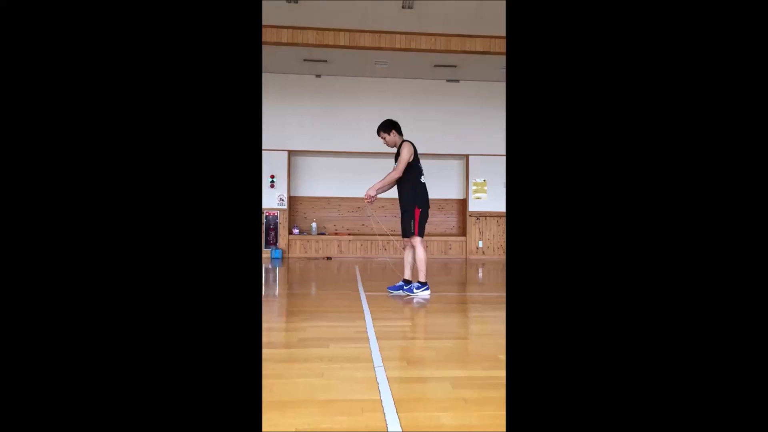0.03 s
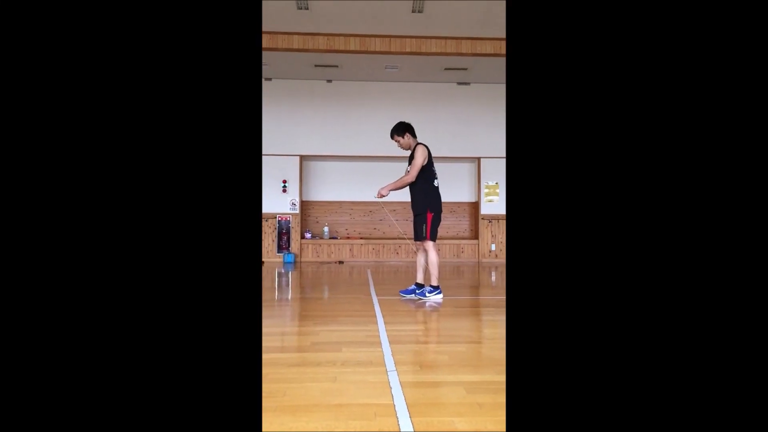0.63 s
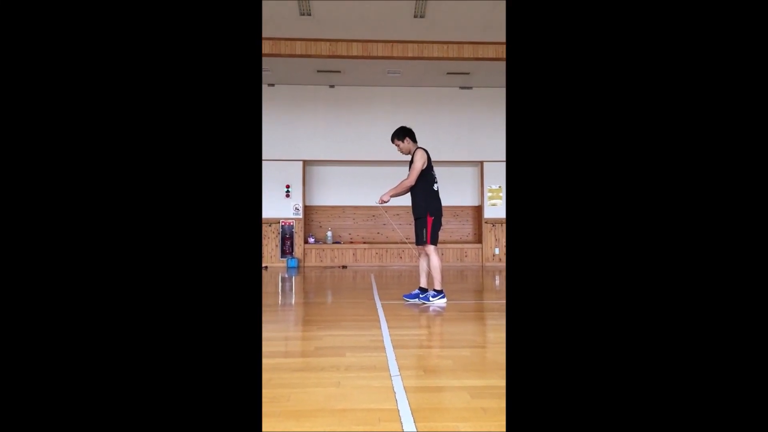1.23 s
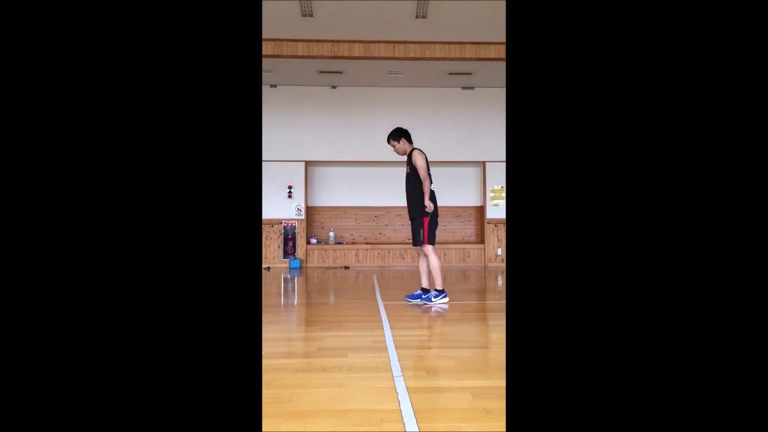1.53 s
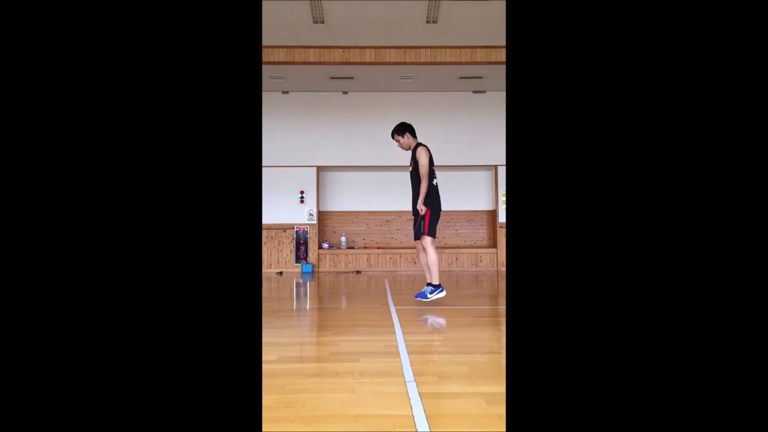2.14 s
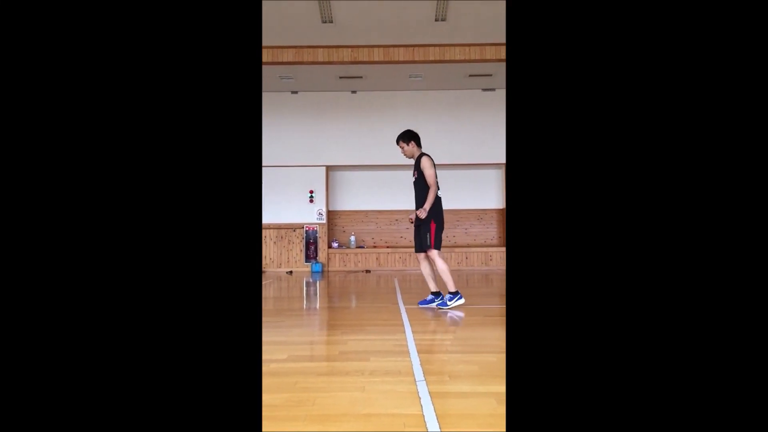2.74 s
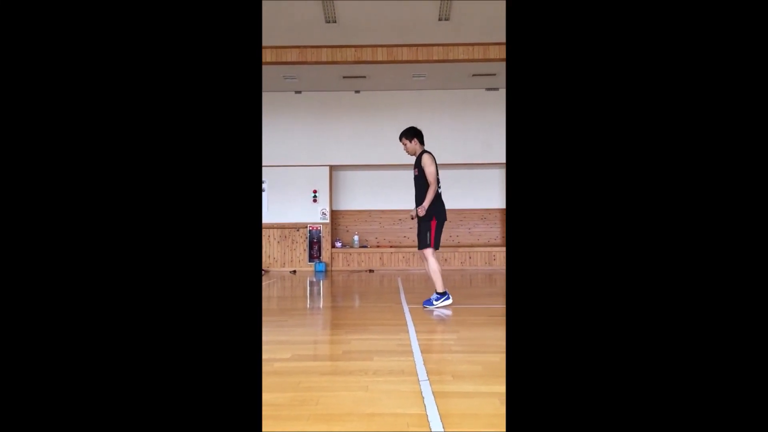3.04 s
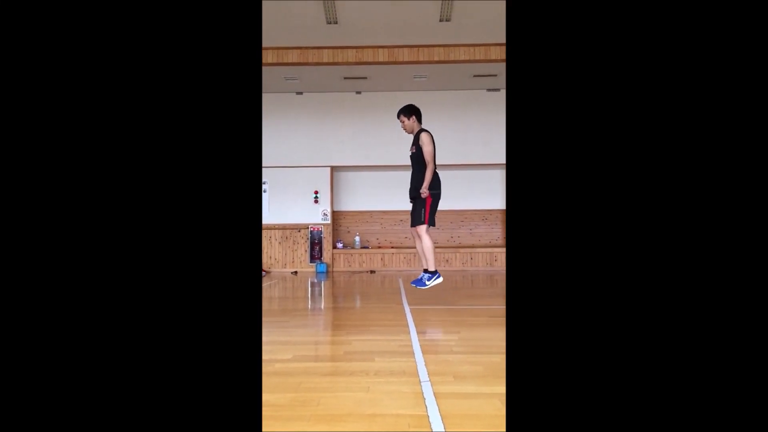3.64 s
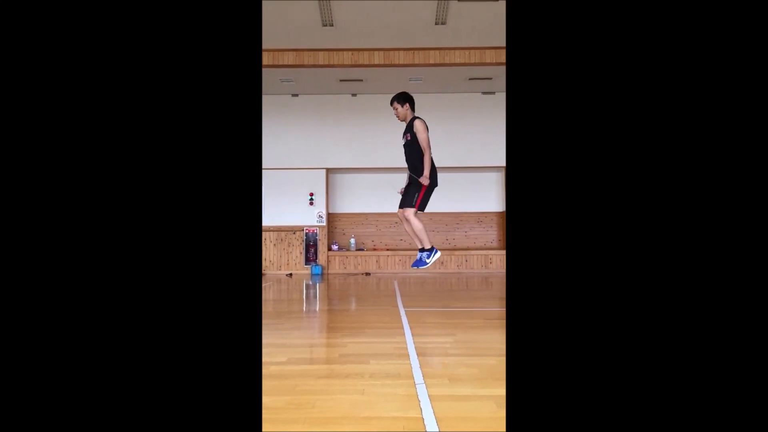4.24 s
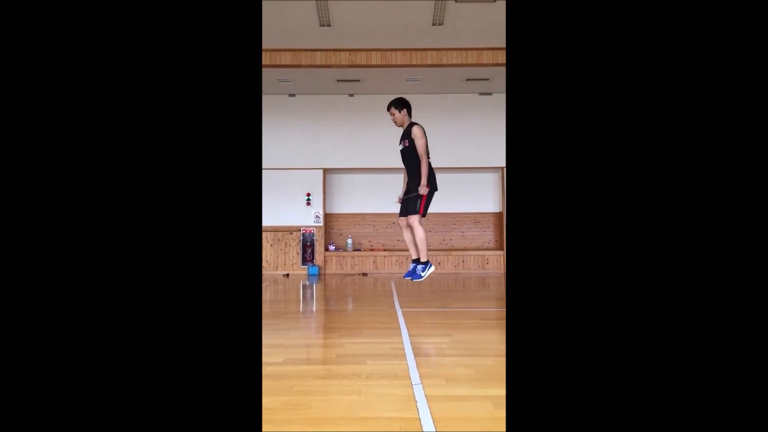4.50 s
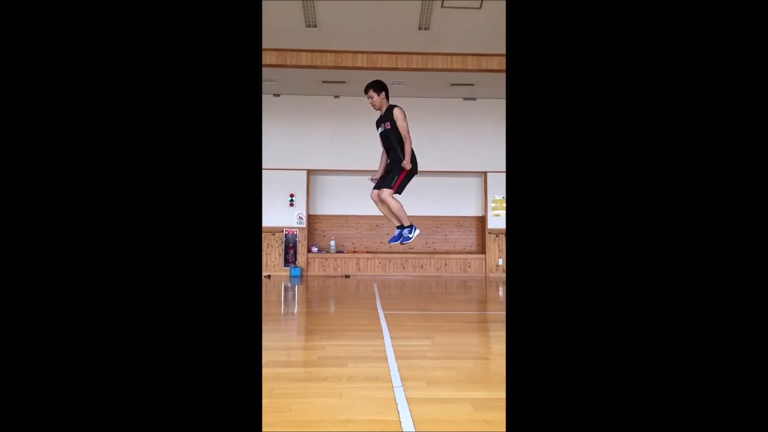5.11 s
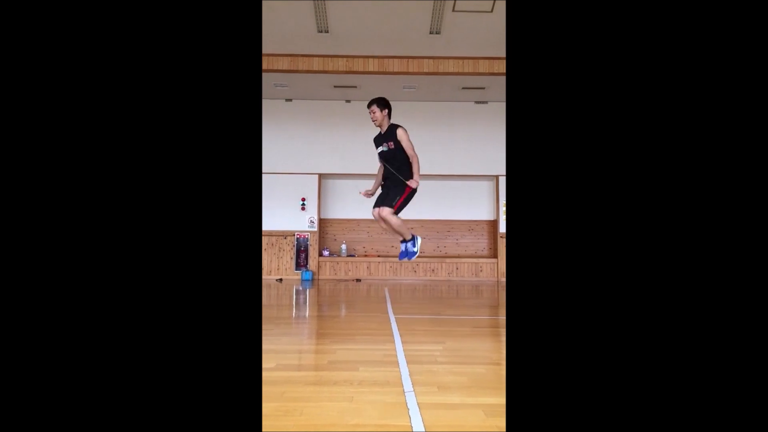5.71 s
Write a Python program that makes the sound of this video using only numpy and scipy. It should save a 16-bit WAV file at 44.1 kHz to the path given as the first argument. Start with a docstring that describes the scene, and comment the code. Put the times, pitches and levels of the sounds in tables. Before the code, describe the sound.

In a large, echoing gym, plastic skipping rope handles clack lightly over a few soft steps. Easy hops begin, the thin rope ticking on the wooden floor between shoe slaps and low booms from the boards. The jumps then grow higher and further apart, and the rope spins fast with a fluttering whistle that rises in pitch and loudness. A faint building rumble lies underneath.

```python
"""Speed skipping in a gym

Plastic handles clack as the rope is readied; a few easy hops lead to high jumps with fast turns.
Shoes slap the boards and excite the low modes of the sprung wooden floor, which booms.
The thin rope ticks on the boards and sheds vortices, whistling higher the faster it moves.
The large hall reverberates over the low rumble of the building."""
import sys
import numpy as np
from scipy import signal
from scipy.fft import rfft, irfft
from scipy.io import wavfile
from scipy.ndimage import uniform_filter1d

SR = 44100
rng = np.random.default_rng(int(sys.argv[2]) if len(sys.argv) > 2 else 0)


def to_wav(sig):
    """Store sig (one row per channel, or 1-D mono) as 16-bit WAV at the path in sys.argv[1].

    Samples outside -1..1 are clipped; the rate is SR.
    """
    pcm = np.clip(np.atleast_2d(sig), -1, 1) * 32767
    pcm = np.round(pcm).astype(np.int16)
    wavfile.write(sys.argv[1], SR, pcm.T)  # frames by channels


N = 262836
TIME = np.arange(N) / SR

# Levels in the tables are relative: gains and filters follow.
# spectra of the building, handles, floor, soles and rope strikes: (frequency [Hz], density [dB])
RUMBLE_SPECTRUM = [(25, -25), (45, -2), (70, 1.5), (130, -6), (250, -11), (450, -22), (1000, -23),
                   (2500, -24.5), (6000, -30), (16000, -37.5)]
CLACK_SPECTRUM = [(500, -9), (1000, -0.5), (1400, 1.5), (1800, 2), (2400, 1.5), (3100, 5.5), (3700, -1),
                  (4400, -3), (6000, -27), (16000, -43)]
CLICK_SPECTRUM = [(1500, -6), (4000, -8.5), (6000, 10.5), (8500, 1), (10500, 2), (14500, -10), (17000, -9)]
BOOM_SPECTRUM = [(22, -14), (42, -14.5), (70, 9.5), (90, 5), (130, 3.5), (175, -13.5), (300, -33),
                 (900, -17.5), (2000, -47)]
THUD_SPECTRUM = [(60, -21.5), (150, 5), (260, 4), (480, -3.5), (680, 0.5), (1100, -25), (1600, -17.5),
                 (2300, -20), (3800, -39), (7500, -29), (10000, -37), (16000, -64)]
SOLE_SPECTRUM = [(150, 1.5), (700, 16), (1300, -2.5), (1900, 3.5), (3300, 5), (7800, 0.5), (10500, -7.5),
                 (16000, -19)]
TICK_SPECTRUM = [(300, -13), (900, 10.5), (1400, 9), (2800, 3), (4300, 1), (7000, -4), (9500, -3.5),
                 (12000, -14), (16000, 3)]
SIZZLE_SPECTRUM = [(3000, -11), (9000, -12), (12000, -8.5), (15000, -8.5), (17000, -28.5)]
# decay of the hall, where a negative time means growth: (frequency [Hz], reverberation time [s])
HALL_DECAY = [(60, 2.24), (250, 1.5), (1000, 0.88), (3000, 0.7), (6000, 0.65), (10000, 0.2), (15000, -0.6)]
# reverberant against direct energy: (frequency [Hz], ratio [dB])
REVERB_RATIO = [(60, -0.1), (400, -1.64), (1200, -4), (3000, -7), (7000, -6.5), (15000, -6)]
# reflections off the nearest walls: (delay [s], level [dB])
WALL_ECHOES = [(.0293, -12), (.0492, -20)]
# handles and fittings colliding, the row at 0.282 s being a faint wall echo of the clack at 0.257 s: (time [s],
# hollow clack [dB], bright click [dB], ring pitch [Hz])
HANDLE_HITS = [(0.15, -63, -55.5, 7500), (0.257, -45.5, -43.5, 2520), (0.282, -54.5, -60, 2400),
               (0.598, -51.5, -52, 3940), (0.622, -47.5, -50, 3400), (0.652, -51, -68, 3550),
               (1.159, -54, -60, 2900), (1.607, -37, -41, 3910), (1.751, -47, -41.5, 3700),
               (1.777, -48, -37.5, 6160), (1.851, -37.5, -39, 5260), (1.855, -37.5, -36.5, 4440),
               (2.164, -46.5, -73, 2000)]
# soft steps and shifts of weight: (time [s], weight [dB])
SOFT_STEPS = [(0.147, -53.5), (0.43, -58.5), (0.8, -68), (1.19, -55.5), (1.271, -45.5), (1.741, -38.5),
              (1.849, -40), (2.26, -52.5)]
# boards resounding under a rolling foot: (frequency [Hz], level [dB], t60 [s])
BOARD_RESONANCES = [(644, -26, 0.098), (924, -19.5, 0.022)]
# the floor springs back as the feet leave for a high jump: (time [s], level [dB])
TAKE_OFFS = [(5.024, -32.5), (5.854, -20.5)]
# the floor takes the weight:
# (time [s], sway pitch [Hz], sway [dB], note pitch [Hz], note [dB], note rise [s], overtone [dB])
FLOOR_LOADS = [(1.276, 50, -60, 79.8, -43, 0.083, -47), (1.744, 50.7, -48, 80.6, -45.5, 0.13, -55),
               (2.465, 51.7, -35, 65.8, -38, 0.092, -35), (2.84, 47.7, -38.5, 67.8, -35.5, 0.089, -32),
               (3.2067, 49.5, -37, 67.5, -36.5, 0.088, -32), (3.578, 50.3, -35, 70.27, -30.5, 0.087, -35),
               (4.136, 46.95, -39, 69.6, -34, 0.23, -40), (4.86, 41.9, -29, 64.1, -41, 0.052, -26.5),
               (5.652, 41.6, -31, 72.8, -34, 0.093, -38)]
# feet coming down: (time [s], sole click [dB], board knock [dB], weight [dB])
FOOTFALLS = [(2.466, -24.5, -36.5, -35), (2.83, -22, -37.5, -38), (2.868, -23, -40.5, -41),
             (3.2057, -23, -43, -38.5), (3.578, -23, -35, -37), (4.136, -12.5, -28.5, -32),
             (4.861, -18, -28, -31.5), (5.648, -22, -28.5, -36.5), (5.652, -14, -23.5, -35.5)]
# the rope strikes the boards, then its loop slaps down:
# (time [s], tick [dB], board knock [dB], sizzle [dB], slap delay [s], slap [dB])
ROPE_STRIKES = [(2.357, -32.5, -34.5, -38, 0.015, -35), (2.7465, -29.5, -26.5, -35.5, 0.0079, -34),
                (3.112, -32, -33, -44, 0.0061, -39), (3.46, -35, -34, -38, 0.01, -33),
                (3.738, -46, -29.5, -66, 0.029, -48), (3.7775, -35, -32, -40.5, 0.0094, -32.5),
                (4.0537, -32, -26, -34.5, 0.0069, -30.5), (4.301, -32, -24.5, -60, 0.011, -39),
                (4.314, -24.5, -23, -45, 0.012, -18.5), (5.028, -25.5, -23.5, -39.5, 0.011, -33),
                (5.5996, -40, -20, -26, .0079, -31), (5.8173, -31, -18.5, -47, 0.012, -18.5)]
# the arms speed the rope up for each jump: (time [s], whistle pitch at the tip [Hz], level [dB])
SWING_CURVE = [(2.55, 1520, -77), (2.648, 1800, -70), (2.704, 2080, -60), (2.76, 2210, -68),
               (2.88, 1505, -72), (3.0, 1843, -60), (3.078, 2290, -69), (3.281, 1560, -80),
               (3.385, 1973, -70), (3.424, 2340, -58), (3.47, 2260, -79), (3.62, 1700, -66),
               (3.72, 2296, -58), (3.8, 2623, -50), (3.88, 2840, -51.5), (4.03, 2760, -55),
               (4.219, 2344, -52), (4.29, 2883, -50.5), (4.37, 3600, -37.5), (4.498, 3586, -39),
               (4.641, 3280, -50), (4.769, 3063, -48), (4.861, 2650, -58.5), (4.94, 2380, -54),
               (5.02, 3257, -38.5), (5.1, 3698, -39.5), (5.2, 4003, -35), (5.37, 4074, -36.5),
               (5.48, 3750, -41.5), (5.58, 3600, -41.5), (5.72, 2630, -49.5), (5.78, 3218, -43.5),
               (5.84, 4203, -31.5), (5.9, 4747, -24.5), (5.96, 5270, -26.5)]
# the wrists whip the rope round: (time [s], speed gained [fraction], level gained [dB])
WRIST_WHIPS = [(3.744, .18, 4.5), (3.892, 0.0585, 5.5), (3.97, 0.065, 5), (4.395, 0.096, -3.5),
               (4.72, 0.082, 5.5), (5.095, .19, 3.5), (5.18, 0.094, 2.5), (5.295, .12, 3.5),
               (5.377, 0.0503, 7), (5.565, 0.096, 4), (5.874, 0.29, 2.5), (5.938, .3, 9)]


def from_db(db):
    """Amplitude grows tenfold for every 20 dB."""
    return 10 ** (np.asarray(db) / 20)


def rms_one(x):
    """Normalisation to unit mean power."""
    return x / np.sqrt(np.mean(x ** 2) + 1e-20)


def at_hz(points, hz):
    """Interpolation on a logarithmic frequency axis."""
    f, value = np.transpose(points)
    return np.interp(np.log(np.maximum(hz, 1)), np.log(f), value)


def convolve(x, response):
    """Superposition: each input sample launches a copy of the impulse response."""
    return signal.fftconvolve(x, response)[:N]


def colour(x, spectrum, size=8192):
    """Minimum-phase filtering: causal, and scaled to keep the power of white noise."""
    gain = from_db(at_hz(spectrum, np.fft.rfftfreq(size, 1 / SR)))
    cepstrum = irfft(np.log(gain))
    cepstrum[1:size // 2] *= 2
    cepstrum[size // 2 + 1:] = 0
    response = irfft(np.exp(rfft(cepstrum)))
    return convolve(x, response / np.linalg.norm(response))


def drift(rate):
    """Random modulation: a line through `rate` Gaussian values a second."""
    knots = rng.standard_normal(N // 8)
    return np.interp(TIME * rate, np.arange(len(knots)), knots)


def blows(times, levels_db):
    """Impulsive excitation: one impulse for each contact."""
    out = np.zeros(N)
    samples = np.round(np.asarray(times) * SR).astype(int)
    out[np.clip(samples, 0, N - 1)] = from_db(levels_db)
    return out


def rattle(hits, t60, rise_s):
    """Damped random vibration: noise swells after each blow and decays exponentially."""
    t = TIME[:SR]
    envelope = from_db(-60 * t / t60) * (1 - np.exp(-t / rise_s))
    return convolve(hits, envelope) * rng.standard_normal(N)


def ring(hits, hz, t60, rise_s):
    """Resonance: a single damped mode builds up and dies away."""
    t = TIME[:2 * SR]
    envelope = from_db(-60 * t / t60) * (1 - np.exp(-t / rise_s))
    return convolve(hits, np.sin(2 * np.pi * hz * t) * envelope)


def swell(at, hz, peak_s):
    """Inertia: a heavy mode takes peak_s to reach unit amplitude, then ebbs."""
    t = np.maximum(TIME - at, 0)
    return np.sin(2 * np.pi * hz * t) * (t / peak_s * np.exp(1 - t / peak_s)) ** 2


def knock(hits, hz, lead_s, fade_s):
    """Dispersion: bending waves in the boards outrun the air, so a falling chirp leads each contact."""
    advance = SR // 100
    t = TIME[:SR // 20] - TIME[advance]
    early = np.minimum(t, 0)
    pitch = hz * (1 - early / 0.01198)
    envelope = np.exp(early / lead_s - np.maximum(t, 0) / fade_s)
    wave = np.sin(2 * np.pi * np.cumsum(pitch) / SR) * envelope
    return convolve(hits, wave)[np.minimum(np.arange(N) + advance, N - 1)]


def building_rumble():
    """Stationary noise: the building's background, strongest in the bass."""
    return from_db(-63.5) * colour(rng.standard_normal(N), RUMBLE_SPECTRUM)


def hall_response():
    """Reverberation: wall echoes, then a diffuse tail; treble dies early, but the top band swells late."""
    t = TIME[:3 * SR // 2]
    edges = np.geomspace(25, 18000, 16)
    white = rng.standard_normal((2, len(t)))
    # near surfaces crowd the first tenth of a second
    onset = (1 + 0.5 * np.exp(-t / 0.15)) * (1 - np.exp(-t / 0.011))
    response = np.zeros(len(t))
    for k, (low, high) in enumerate(zip(edges, edges[1:])):
        hz = np.sqrt(low * high)
        band = signal.sosfilt(signal.butter(2, [low, high], "band", fs=SR, output="sos"), white[k % 2])
        tail = band * onset * from_db(-60 * t / at_hz(HALL_DECAY, hz))
        gain = np.sqrt(2 * (high - low) / SR) * from_db(at_hz(REVERB_RATIO, hz))
        response += gain * tail / np.linalg.norm(tail)
    echoes = blows(*np.transpose(WALL_ECHOES))[:len(t)]
    return response + signal.lfilter([.8], [1, -.35], echoes)


def hall(x, spots=4, moves_per_s=3):
    """Reflections depend on source position: responses take turns as the jumper moves from spot to spot."""
    spot = (TIME * moves_per_s).astype(int) % spots
    shares = [uniform_filter1d((spot == k) * 1., size=256) for k in range(spots)]
    return x + sum(convolve(x * share, hall_response()) for share in shares)


def handles():
    """Impact of light bodies: plastic handles clack, ring and rattle, and the cord rustles after them."""
    s, hollow_db, bright_db, _ = np.transpose(HANDLE_HITS)
    hollow, bright = blows(s, hollow_db), blows(s, bright_db)
    loose = from_db(-12) * rattle(hollow, t60=0.23, rise_s=0.015) * from_db(7.9 * drift(180))
    clack = colour(rattle(hollow, t60=0.019, rise_s=0.00052) + loose, CLACK_SPECTRUM)
    click = colour(rattle(bright, t60=0.017, rise_s=0.00072), CLICK_SPECTRUM)
    rustle = colour(rattle(bright, t60=0.26, rise_s=0.0047) * from_db(1.1 * drift(210)), CLICK_SPECTRUM)
    rings = np.zeros(N)
    for at, db, _, hz in HANDLE_HITS:
        chatter = rattle(blows([at], db), t60=0.061, rise_s=0.0005)
        rings += ring(chatter, hz, t60=0.0061, rise_s=0.000096)
    return clack + from_db(6) * click + from_db(-16) * rustle + from_db(-10) * rings


def steps():
    """Gradual loading: a rolling foot gives a low thump, with the boards resonating above it."""
    weight = blows(*np.transpose(SOFT_STEPS))
    roll = rattle(weight, t60=1.0, rise_s=0.006)
    wood = np.zeros(N)
    for hz, db, t60 in BOARD_RESONANCES:
        energy_scale = np.sqrt(4 * np.log(1000) / (t60 * SR))  # offsets the gain of a long decay
        wood += from_db(db) * energy_scale * ring(roll, hz, t60, rise_s=0.0026)
    boom = colour(rattle(weight, t60=0.61, rise_s=0.0052), BOOM_SPECTRUM)
    return from_db(-17) * colour(roll, THUD_SPECTRUM) + wood + boom


def push_offs():
    """Elastic rebound: the unloaded boards give a dull knock and shudder."""
    hits = blows(*np.transpose(TAKE_OFFS))
    shudder = colour(rattle(hits, t60=0.38, rise_s=0.0023), THUD_SPECTRUM)
    return knock(hits, hz=281.9, lead_s=0.0017, fade_s=0.0032) + from_db(-16) * shudder


def sprung_floor():
    """Normal modes: the floor sways on its springs, with a low note that depends on where the feet land."""
    out = np.zeros(N)
    for s, sway_hz, sway_db, note_hz, note_db, rise_s, overtone_db in FLOOR_LOADS:
        out += from_db(sway_db) * swell(s, sway_hz, peak_s=0.071)
        out += from_db(note_db) * swell(s, note_hz, rise_s)
        overtone_hz = 113.44 * (1 + 0.024 * rng.standard_normal())
        out += ring(blows([s], overtone_db), overtone_hz, t60=0.89, rise_s=0.0017)
    # a random waver stands for the beating of neighbouring modes
    return out * from_db(1.4 * drift(24))


def feet(heel_delay_s=.0275):
    """Impact on a plate: soles slap, toe then heel; the boards knock and shudder, and the floor booms."""
    s, click_db, knock_db, weight_db = np.transpose(FOOTFALLS)
    heel_s = s + heel_delay_s
    soles = blows(s, click_db) + blows(heel_s, click_db - 19)
    skid = rattle(soles, t60=.004, rise_s=.0001)
    slap = colour(from_db(7) * soles + from_db(2.5) * skid, SOLE_SPECTRUM)
    knocks = blows(s, knock_db) + blows(heel_s, knock_db - 16.5)
    boards = from_db(10) * knock(knocks, hz=1111, lead_s=0.00091, fade_s=0.0012)
    toes, heels = blows(s, weight_db), blows(heel_s, weight_db + 1)
    shudder = rattle(toes, t60=0.51, rise_s=0.0022) + rattle(heels, t60=0.08, rise_s=0.00065)
    thud = colour(shudder, THUD_SPECTRUM)
    boom = colour(rattle(toes, t60=0.74, rise_s=0.018), BOOM_SPECTRUM)
    return slap + boards + from_db(-0.5) * (thud + boom)


def rope_taps():
    """Brief contact gives a broad spectrum: the hard rope cracks twice on the varnish and skids."""
    s, tick_db, knock_db, sizzle_db, delay_s, slap_db = np.transpose(ROPE_STRIKES)
    slap_s = s + delay_s
    ticks = blows(s, tick_db) + blows(slap_s, slap_db)
    treble = blows(s, sizzle_db) + blows(slap_s, sizzle_db - 3)
    knocks = blows(s, knock_db) + blows(slap_s, knock_db - 16)
    skid = from_db(-7) * rattle(ticks, t60=0.043, rise_s=.0001)
    crack = colour(from_db(9.5) * ticks + skid, TICK_SPECTRUM)
    burst = rattle(treble, t60=0.013, rise_s=.0001)
    tail = from_db(-22) * rattle(treble, t60=0.14, rise_s=0.0041)
    sizzle = colour(from_db(9) * treble + burst + tail, SIZZLE_SPECTRUM)
    boards = from_db(-7) * knock(knocks, hz=1303.3, lead_s=0.0028, fade_s=0.0015)
    ringing = from_db(-10.5) * ring(knocks, hz=1254, t60=.04, rise_s=.0005)
    return crack + sizzle + boards + ringing


def swing(whip_half_width_s=.015):
    """Strouhal's law: the tip's pitch follows its speed; each whip lifts it and shifts the level."""
    s, hz, db = np.transpose(SWING_CURVE)
    tip_hz, level_db = np.interp(TIME, s, hz), np.interp(TIME, s, db, left=-120)
    for at, share, gain_db in WRIST_WHIPS:
        surge = np.exp(-((TIME - at) / whip_half_width_s) ** 2)
        tip_hz *= 1 + share * surge
        level_db += gain_db * surge
    return tip_hz, level_db


def rope_whistle(stretches=7):
    """Aeolian tones: each stretch of rope sheds vortices at a pitch set by its speed."""
    tip_hz, level_db = swing()
    # the faster the rope, the more of its length whistles: a thin tone widens to a rough band
    spread = np.clip(.22 * np.log2(tip_hz / 1700) + .04, .09, .3)
    tones = np.zeros(N)
    for inward in np.linspace(0, 1, stretches):
        # turbulence frays each tone, and the whipping rope bends it and makes it flutter
        fray, bend = .19 * drift(1800), .17 * drift(80)
        hz = tip_hz * (1 - spread * inward) * (1 + spread * (fray + bend))
        flutter = from_db(4.5 * drift(110))
        strength = np.exp(-((inward - .3) / 0.58) ** 2)
        tones += strength * flutter * np.sin(2 * np.pi * np.cumsum(hz) / SR)
    # the turbulent wake adds a faint broad hiss
    wake = colour(rng.standard_normal(N),
                  [(200, -38), (1200, -18), (1900, 8), (2600, 9), (6000, 4), (9000, 4), (16000, -4)])
    # the tone comes and goes as the loop turns, most of all when it is slow
    waver_db = np.interp(tip_hz, [2200, 3600], [4.5, 1.5])
    tones *= from_db(waver_db * drift(38))
    return from_db(level_db) * (rms_one(tones) + from_db(-20) * wake)


def scene():
    """Superposition: jumper and rope reverberate in the hall, over the floor's modes and the rumble."""
    rumble = building_rumble()
    jumper = feet() + steps() + push_offs()
    rope = rope_taps() + handles() + rope_whistle()
    return (hall(jumper + rope) + sprung_floor() + rumble)[None]


def record(dry, start_s=0.142, cutoff_hz=16000):
    """Gating and band limiting: the sound opens after a moment, with a treble dip and the top cut."""
    gate = np.clip((TIME - start_s) / 0.0019, 0, 1)
    heard = colour(dry[0] * gate, [(20, 2), (8800, -1), (10400, -2.5), (11800, 2), (16000, 1)])
    lowpass = signal.firwin(161, cutoff_hz, fs=SR, window="blackman")
    return np.convolve(heard, lowpass, "same")[None]


dry = scene()
out = record(dry)
to_wav(out)
```